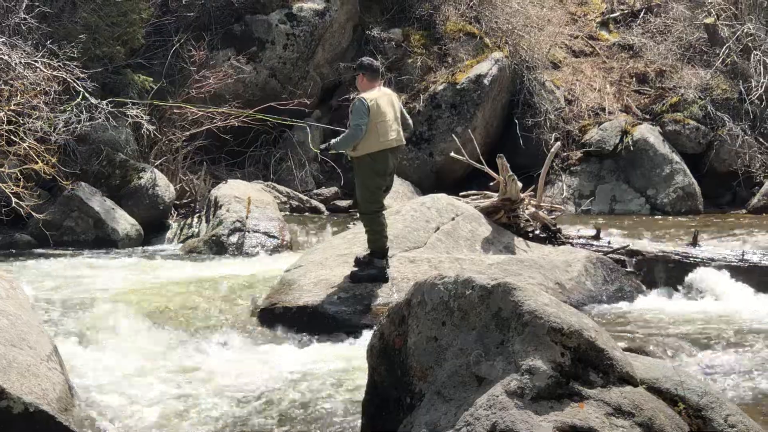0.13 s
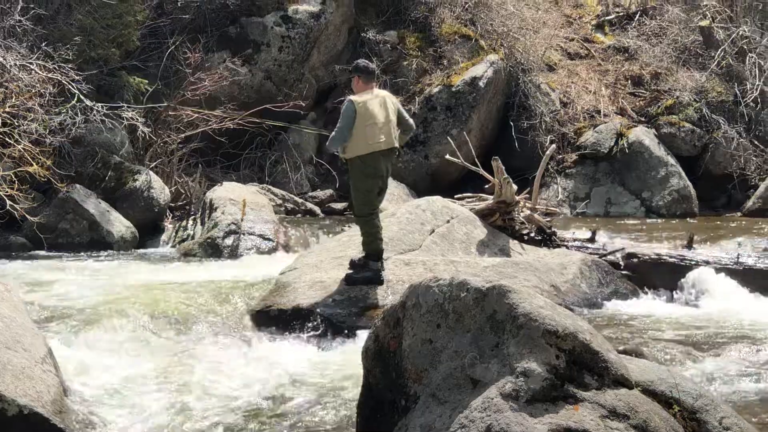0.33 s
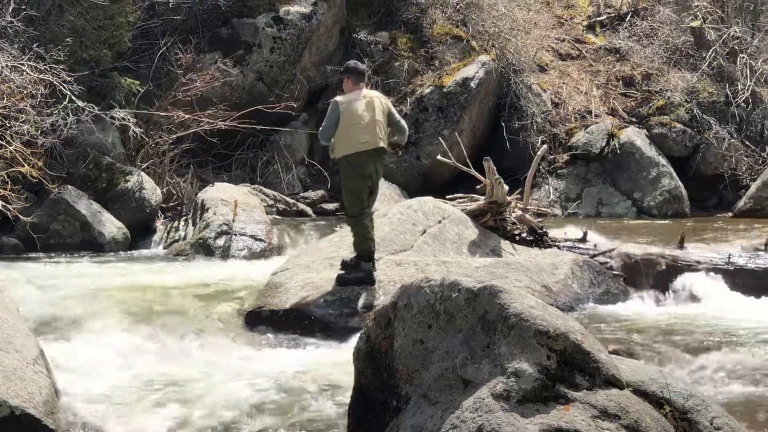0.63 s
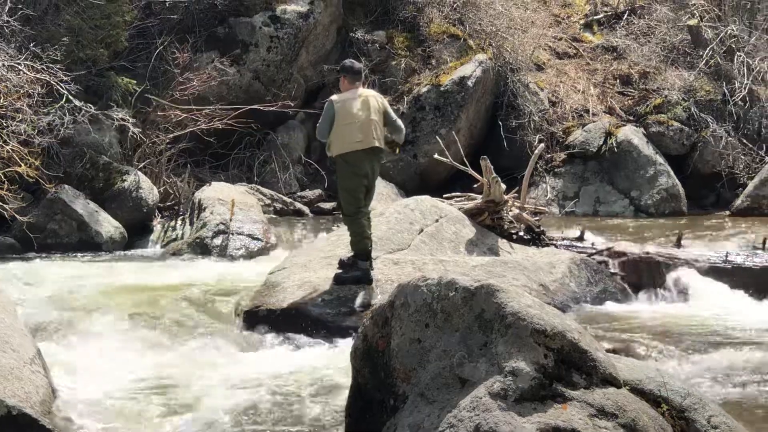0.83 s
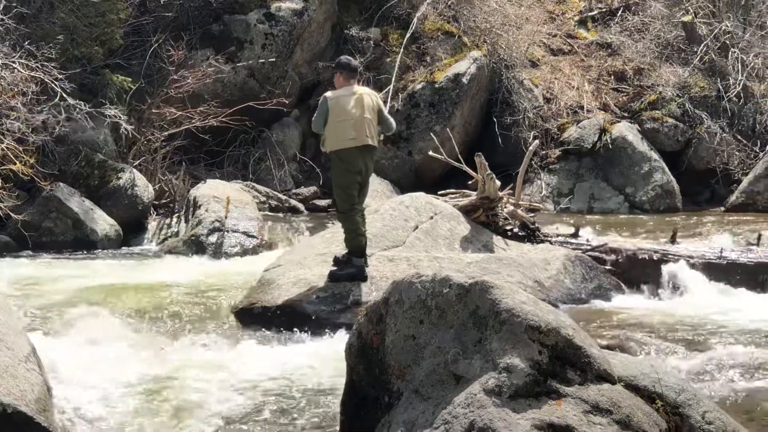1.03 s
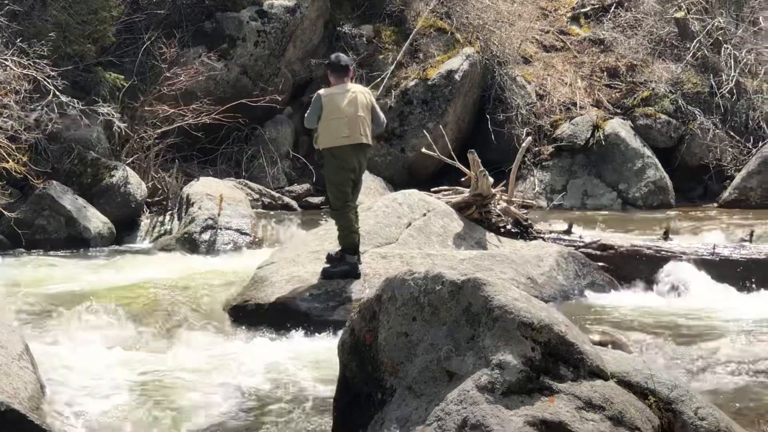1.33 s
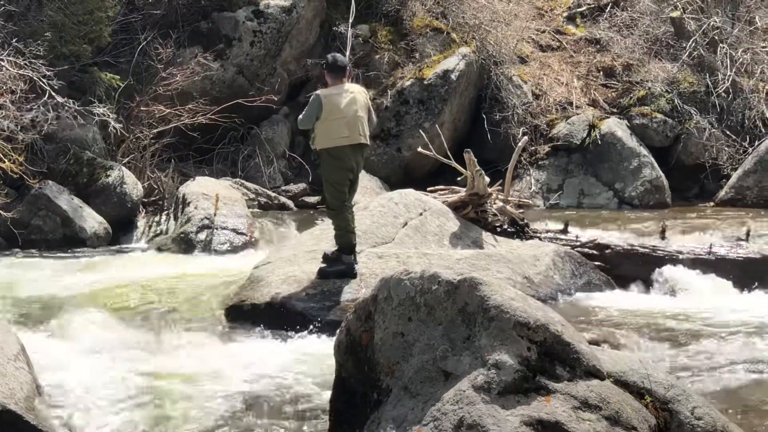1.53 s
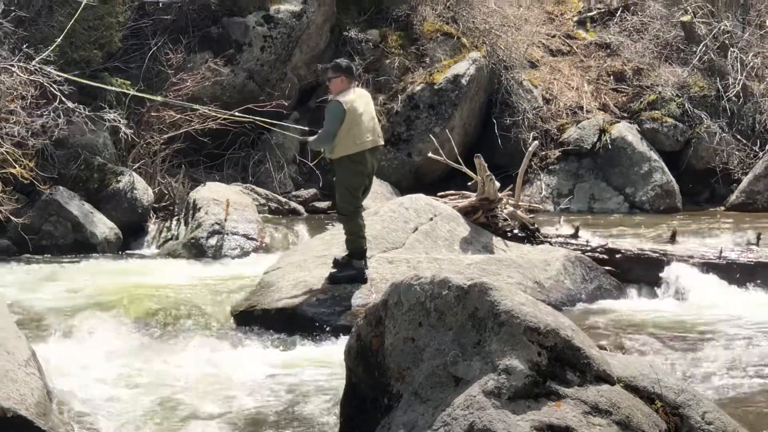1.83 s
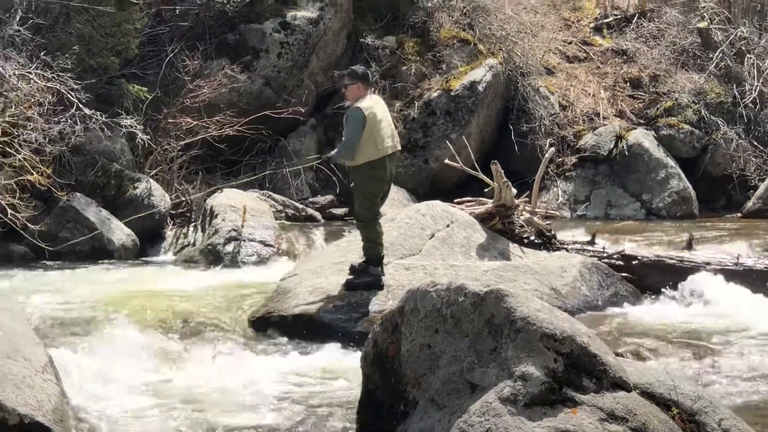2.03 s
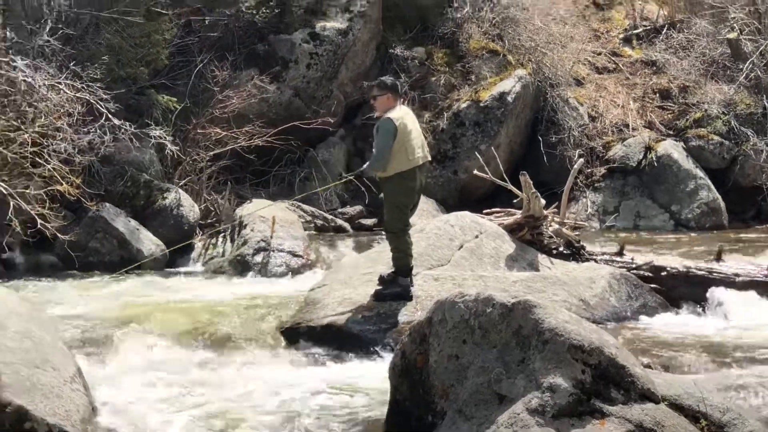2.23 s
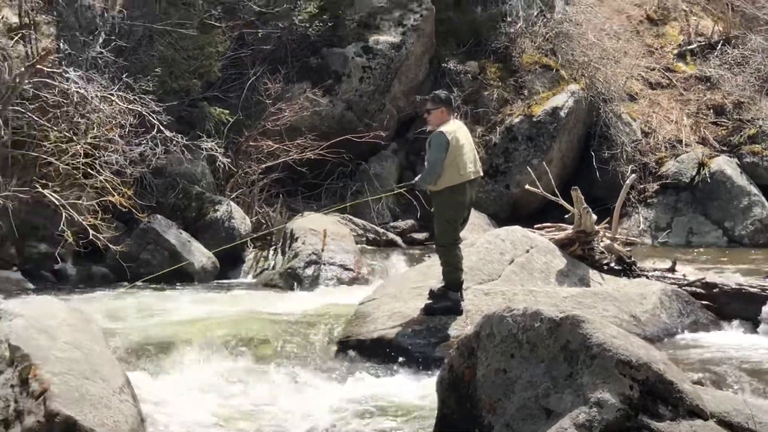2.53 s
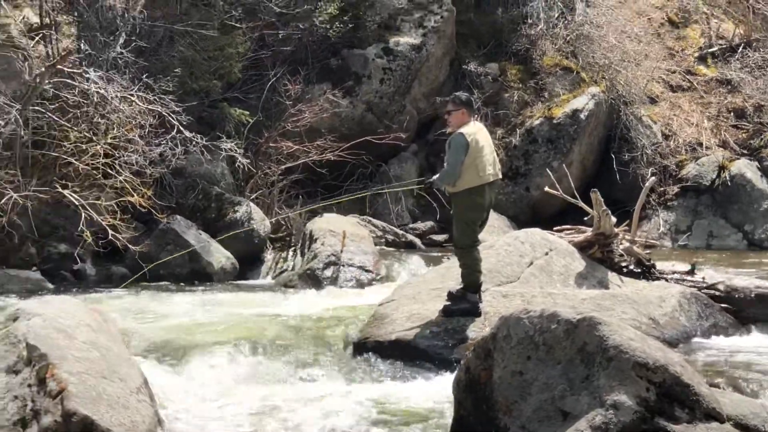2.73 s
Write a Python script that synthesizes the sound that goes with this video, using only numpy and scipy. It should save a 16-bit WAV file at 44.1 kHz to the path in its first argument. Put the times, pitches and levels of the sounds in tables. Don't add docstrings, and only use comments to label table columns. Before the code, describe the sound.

River rapids roar steadily over boulders while gusty wind rumbles and thumps on the microphone

```python
import sys
import numpy as np
from scipy import signal
from scipy.fft import rfft, irfft
from scipy.io import wavfile
from scipy.ndimage import uniform_filter1d

SR = 44100
rng = np.random.default_rng(int(sys.argv[2]) if len(sys.argv) > 2 else 0)


def boost_factor(decibels):
    exponent = np.asarray(decibels, float) / 20
    return 10 ** exponent


def master(y):
    cut = np.clip(np.atleast_2d(y).T, -1, 1)
    pcm = np.round(cut * 32767)
    wavfile.write(sys.argv[1], SR, pcm.astype(np.int16))


N = 127890


def evened(x):
    return x / np.sqrt(np.mean(x ** 2) + 1e-20)


def read(points, hz):
    f, level_db = np.transpose(points)
    return np.interp(np.log(hz + 1), np.log(f + 1), level_db)


def coloured(x, points):
    hz = np.fft.rfftfreq(len(x), 1 / SR)
    return irfft(rfft(x) * boost_factor(read(points, hz)), len(x))


def wander(rate_hz):
    hz = np.fft.rfftfreq(N, 1 / SR)
    slow = (hz > 0) / (1 + (hz / rate_hz) ** 4)
    return evened(irfft(rfft(rng.standard_normal(N)) * slow, N))


def scattered(per_s, spread_db, shapes):
    size = boost_factor(spread_db * np.minimum(rng.exponential(1, N), 5))
    size = size * (rng.random(N) < per_s / SR) * rng.choice([-1., 1.], N)
    which = rng.integers(0, len(shapes), N)
    layers = [signal.oaconvolve(size * (which == k), shape, "same") for k, shape in enumerate(shapes)]
    return evened(sum(layers))


def flecks():
    # (middle [s], low edge [Hz], high edge [Hz], level [dB])
    fleck_table = [
        (.604, 4580, 6500, -44),
        (1.579, 8100, 9900, -51),
        (1.602, 4100, 5230, -50),
        (2.067, 14400, 15700, -61),
        (2.09, 4600, 5900, -48),
        (2.16, 5160, 6500, -48),
        (2.16, 12300, 14700, -56),
        (2.763, 6700, 8500, -49),
        (2.763, 13000, 14700, -57),
        (2.81, 11000, 14000, -49),
    ]
    length_s = .044
    t, hz, out = np.arange(N) / SR, np.fft.rfftfreq(N, 1 / SR), np.zeros(N)
    noise = rfft(rng.standard_normal(N))
    for s, low_hz, high_hz, db in fleck_table:
        band = evened(irfft(noise * (hz > low_hz) * (hz < high_hz), N))
        fade = np.cos(np.pi * np.clip((t - s) / length_s, -.5, .5))
        out += boost_factor(db) * band * fade
    return np.array([out, -out])


def gust_db():
    # (time [s], level [dB])
    gust_table = [(0.08, -32), (0.12, -29.5), (0.35, -41.5), (0.64, -25), (0.75, -34.5), (0.82, -22.5),
                  (0.92, -27), (0.97, -25), (1.23, -24.5), (1.27, -28), (1.39, -28.5), (1.81, -25.5),
                  (1.98, -35.5), (2.07, -26), (2.2, -40), (2.24, -26), (2.49, -37.5), (2.9, -27)]
    return np.interp(np.arange(N) / SR, *np.transpose(gust_table))


def eddy(hz, phase):
    turns, sag, tail = .9, .4, 1.3
    u = np.arange(-2000, 2001) / SR * hz / turns
    bend = sag * (np.sqrt(1 + u ** 2) - 1)
    swing = np.cos(2 * np.pi * turns * (u - bend) + phase)
    return swing * np.exp(-.5 * (u / np.where(u > 0, tail, 1)) ** 2)


def rumble():
    # (frequency [Hz], level [dB per Hz])
    rumble_colour = [(20, -43), (45, 0), (75, -2), (130, -3.5), (250, -10.5), (500, -15), (900, -32),
                     (2000, -57)]
    lumpy_db, eddies_per_s, eddy_db, spread_db = 0.5, 110, -6, 2.5
    follow = 1.15
    gust = gust_db()
    low = evened(coloured(rng.standard_normal(N), rumble_colour)) * boost_factor(gust + lumpy_db * wander(16))
    shapes = [eddy(f, rng.uniform(0, 2 * np.pi)) for f in np.geomspace(111, 543, num=16)]
    small = scattered(eddies_per_s, spread_db, shapes)
    small_db = eddy_db + gust.mean() + follow * (gust - gust.mean())
    return low + small * boost_factor(small_db)


def thumps():
    # (middle [s], peak level [dB],
    # pitch [Hz])
    thump_table = [(0.442, -19, 272), (0.549, -14.5, 430), (0.627, -12, 573), (0.655, -18.5, 340),
                   (0.655, -14, 790), (1.273, -14.5, 83), (1.284, -21, 254), (1.468, -17, 546),
                   (1.557, -15, 205), (1.569, -14.5, 399), (1.713, -14, 340), (1.714, -19, 164),
                   (1.819, -15, 254), (2.059, -20, 315), (2.06, -18.4, 149), (2.112, -14, 238),
                   (2.117, -16, 546), (2.24, -13.5, 475), (2.243, -18.5, 234), (2.255, -23, 440),
                   (2.268, -24, 254), (2.344, -17.5, 319), (2.725, -18.9, 423),
                   (.81, -14, 630), (.829, -16.5, 166), (.816, -30, 746), (.821, -2.5, 527), (0.824, -9.5, 230),
              (.828, -12, 589), (.834, -21, 506), (.866, -18, 500), (0.872, -16, 187), (.874, -15, 458),
              (0.884, -21, 520), (.889, -9.5, 554), (0.895, -9, 540), (.9, -21, 506), (0.924, -10, 450),
              (0.927, -19, 293), (.948, -17, 589), (.954, -9.5, 625), (0.957, -10.5, 212), (.959, -13, 468),
              (0.974, -15, 217), (.98, -14, 296), (.988, -9.5, 402), (0.991, -13, 127), (1.086, -23, 173),
              (1.155, -19, 149), (1.166, -18.5, 335), (1.189, -14.5, 480), (1.193, -14, 497),
              (1.218, -15.5, 296),
                   (.12, -27, 90), (.3, -29, 90), (.62, -23, 110), (0.719, -23.5, 82), (1.0, -15, 103),
              (1.131, -19.5, 90), (1.191, -12, 300), (1.247, -20, 138), (1.33, -20, 93), (1.368, -19.5, 92),
              (1.97, -23, 280), (2.179, -23.5, 124), (2.31, -20.5, 143), (2.409, -21.5, 158),
              (2.851, -24, 173), (1.112, -19, 240), (2.7, -23.5, 170), (2.722, -22.5, 240),
              (.445, -27, 145), (1.84, -26, 130), (1.65, -25, 180), (.085, -23.5, 420), (.2, -26, 144),
              (2, -22, 197), (1.48, -23, 117), (1.175, -21, 130), (2.83, -20.5, 255), (1.4, -26, 130),
              (2.26, -22, 520)]
    puff_db, puff_s = -15, .009
    rows = thump_table
    out, t = np.zeros(N), np.arange(-2000, 2001) / SR
    phases = rng.uniform(0, 2 * np.pi, (len(rows), 1))
    noise = rng.standard_normal((len(rows), len(t)))
    for (s, db, hz), phase, hiss in zip(rows, phases, noise):
        puff_colour = [(30, -30), (.6 * hz, 0), (1.3 * hz, -5), (2.5 * hz, -30), (4000, -60)]
        puff = evened(coloured(hiss, puff_colour)) * np.exp(-abs(t) / puff_s)
        at = round(s * SR) - 2000
        out[at:at + len(t)] += boost_factor(db) * (eddy(hz, phase) + boost_factor(puff_db) * puff)
    return out


def wash():
    patchy_db = 1.1
    z = signal.stft(rng.standard_normal(N), SR, nperseg=512)[2]
    patches = uniform_filter1d(rng.standard_normal(z.shape), size=6, axis=0)
    patches = uniform_filter1d(patches, size=10, axis=1)
    return evened(signal.istft(z * boost_factor(patchy_db * evened(patches)), SR, nperseg=512)[1][:N])


def bubbles():
    per_s, spread_db, turns = 3000, 2.6, 8.
    rings = []
    for f in np.geomspace(300, 15000, num=30):
        u = np.arange(1500) / SR * f / turns
        ring = u * np.exp(-3 * u) * np.sin(2 * np.pi * turns * u * (1 + 0.075 * u))
        rings.append(np.sqrt(f) * evened(ring))
    return scattered(per_s, spread_db, rings)


def rapids():
    # (frequency [Hz], level [dB per Hz])
    water_colour = [(60, -16.5), (500, -4.5), (1000, -7.5), (1500, -12), (2500, -13.5), (3100, -18),
                    (9500, -25), (12500, -31.5)]
    water_db, swell_db, flicker_db, bubble_db = -28.5, .15, .5, -8
    white = wash() + boost_factor(bubble_db) * bubbles()
    level_db = water_db + swell_db * wander(1.3) + flicker_db * wander(40)
    return boost_factor(level_db) * evened(coloured(white, water_colour))


def scene():
    return np.tile(rumble() + thumps() + rapids(), (2, 1))


def roll_off(x):
    return signal.sosfilt(signal.butter(12, 16540, fs=SR, output="sos"), x)


def record(dry):
    low_cut_hz, start_s, top_hz = 40, .0725, 15730
    bass_cut = signal.butter(N=2, Wn=low_cut_hz, btype="high", fs=SR, output="sos")
    heard = signal.sosfilt(bass_cut, dry)
    mix = heard * (np.arange(N) > start_s * SR) + flecks()
    top_cut = signal.firwin(1601, top_hz, window=("kaiser", 9), fs=SR)
    mix = signal.oaconvolve(mix, top_cut[None], "same")
    return roll_off(mix)


dry = scene()
out = record(dry)
master(out)
```